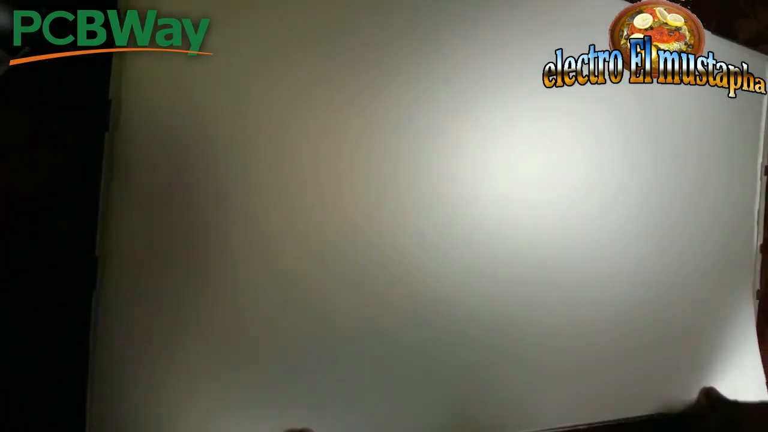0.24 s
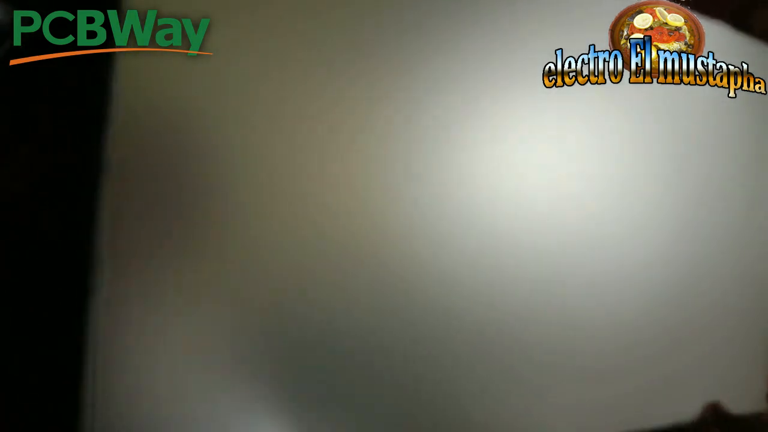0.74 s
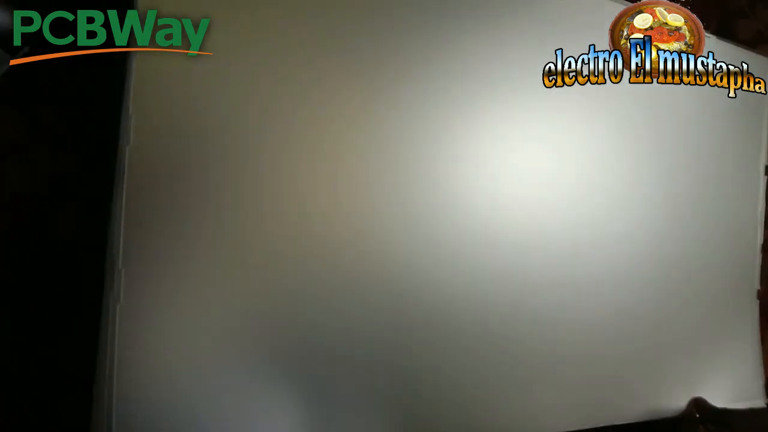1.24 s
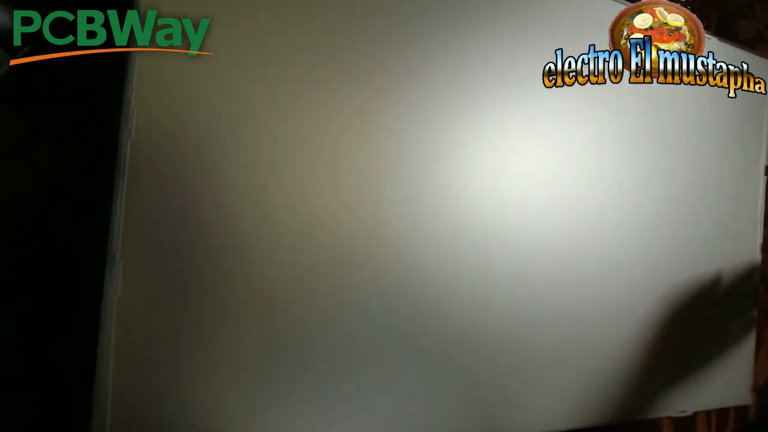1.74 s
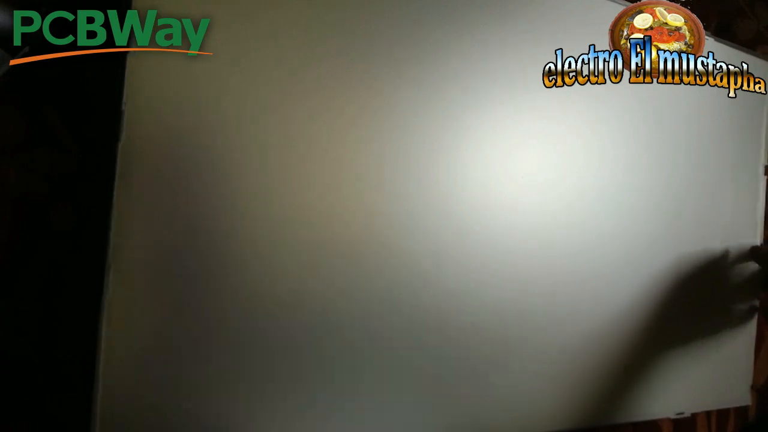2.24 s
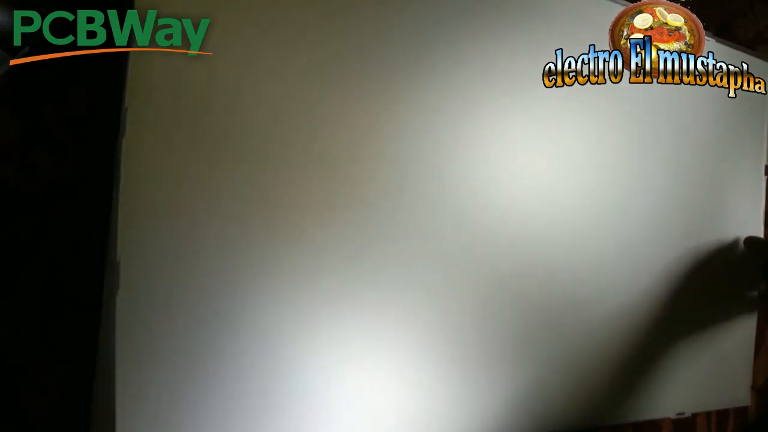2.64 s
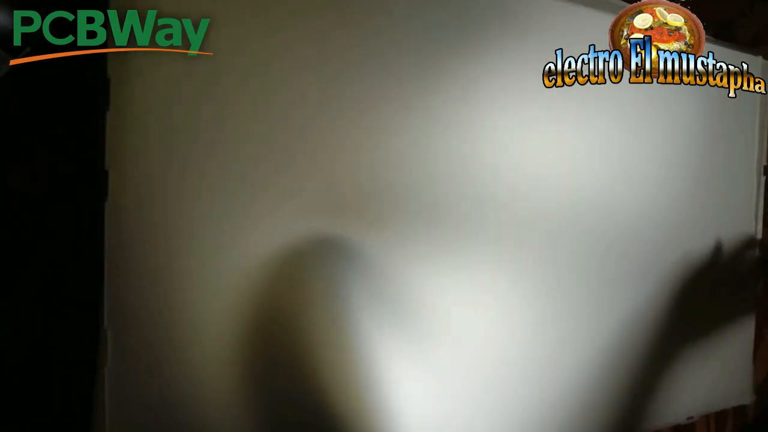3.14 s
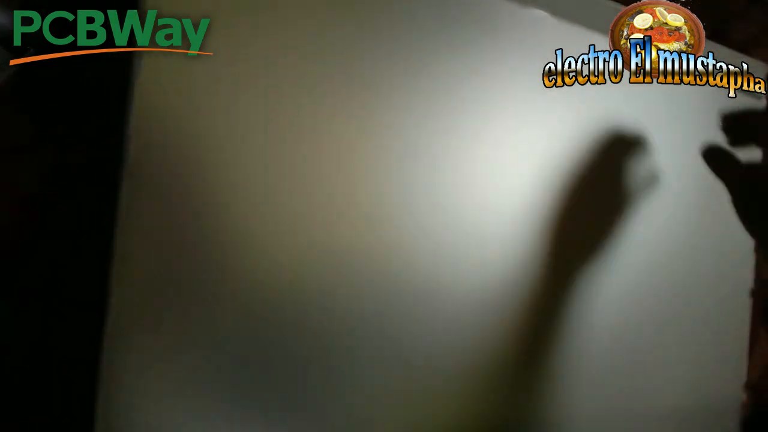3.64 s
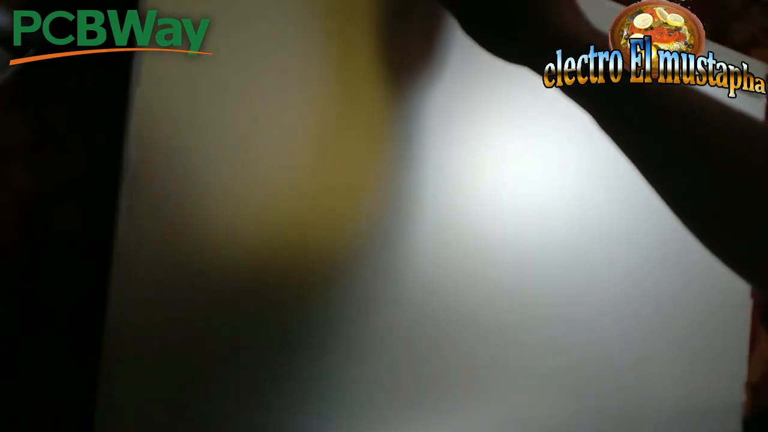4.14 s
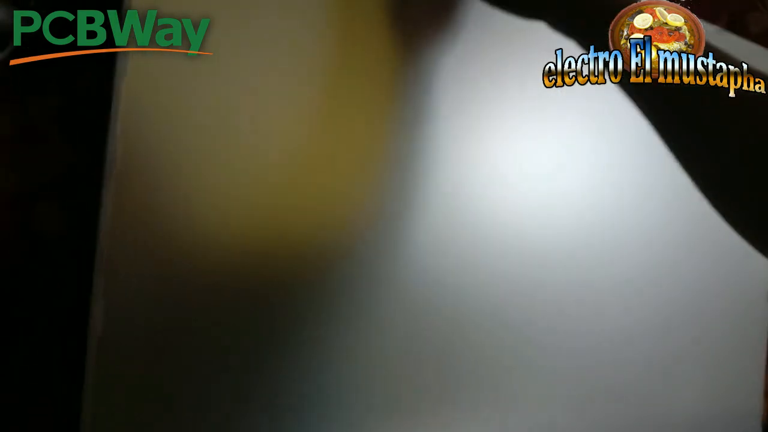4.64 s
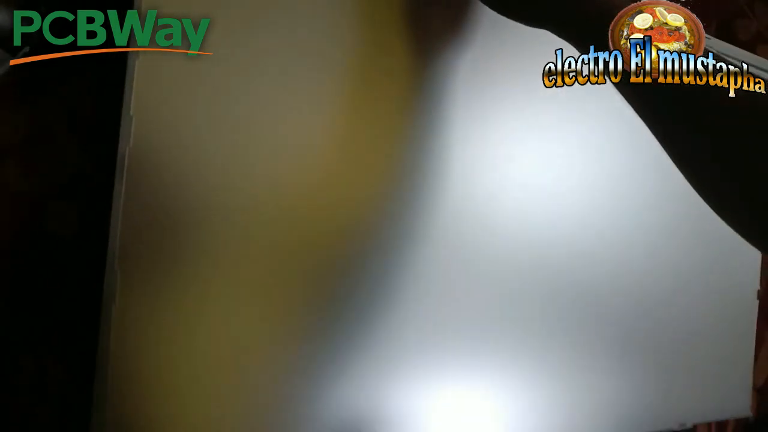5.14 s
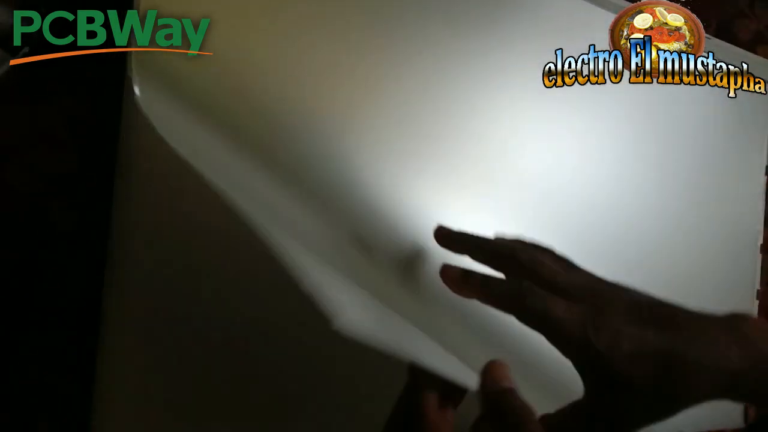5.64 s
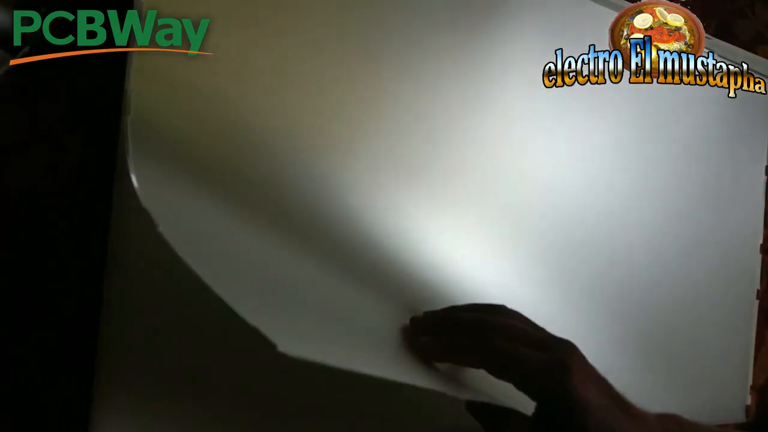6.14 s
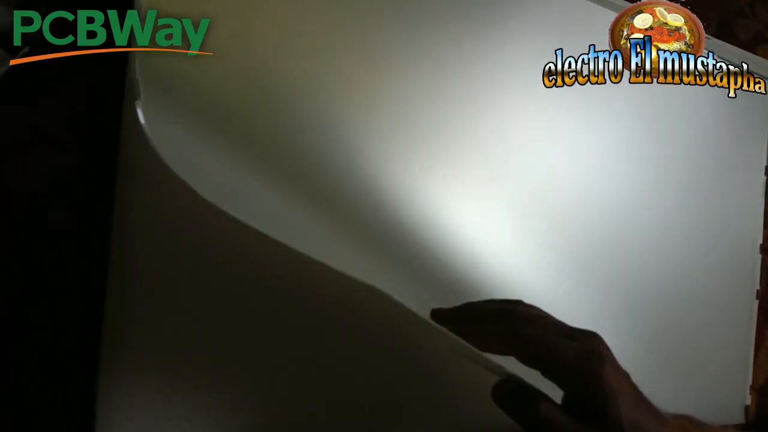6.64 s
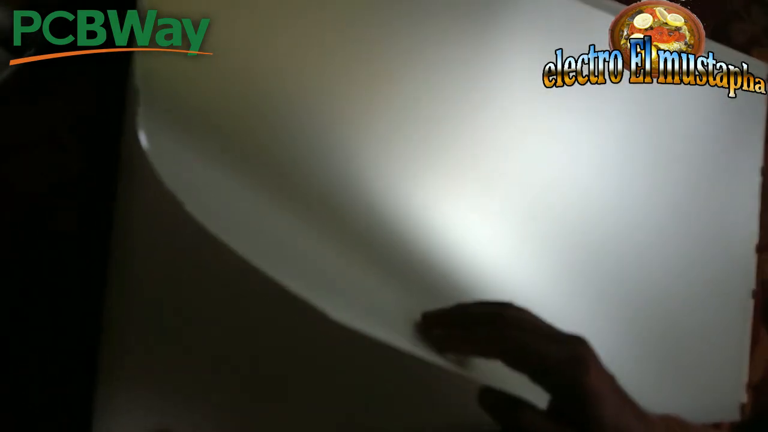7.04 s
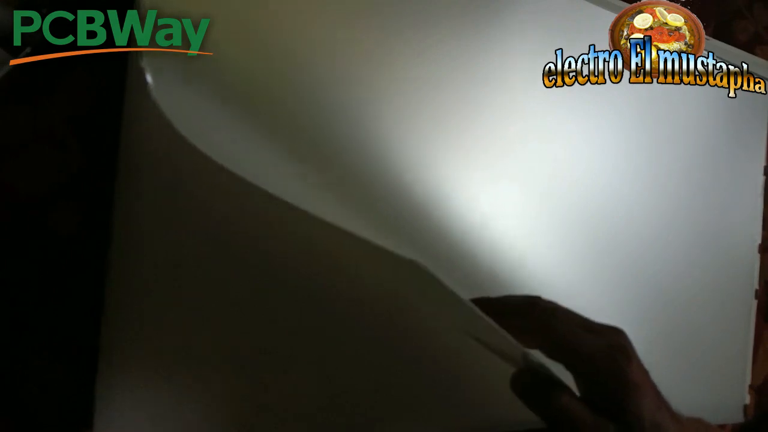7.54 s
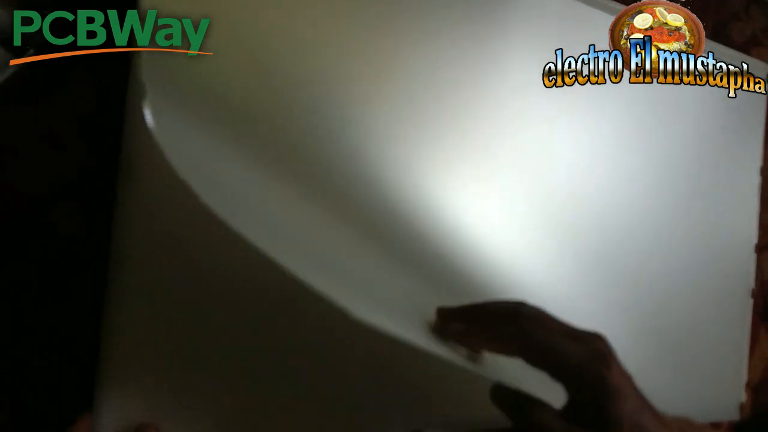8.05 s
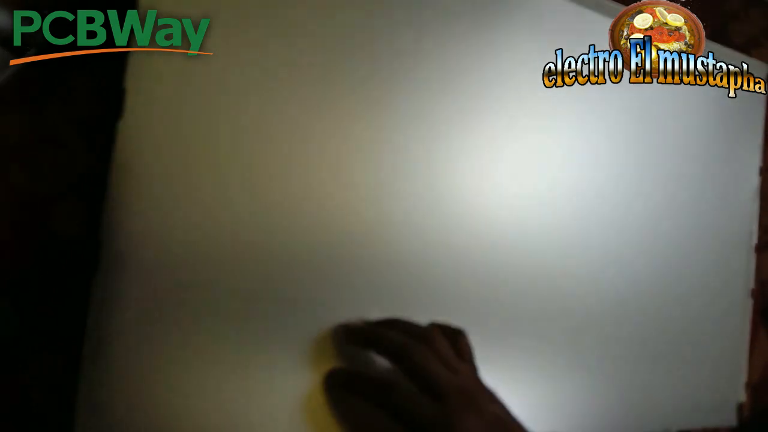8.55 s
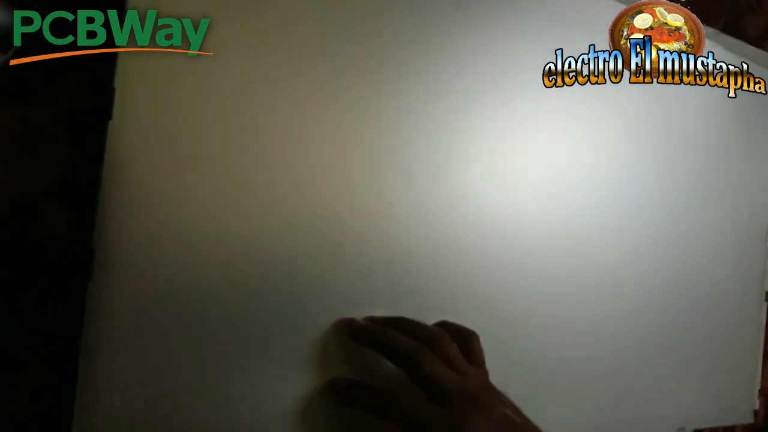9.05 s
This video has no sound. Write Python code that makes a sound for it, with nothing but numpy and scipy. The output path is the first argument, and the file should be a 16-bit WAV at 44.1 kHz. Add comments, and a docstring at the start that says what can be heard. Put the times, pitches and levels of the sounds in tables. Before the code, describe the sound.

Hands lift, slide and lay down springy plastic sheets over a metal-backed panel. Crisp little flicks, dull hollow taps and short grainy swishes come irregularly, busiest in the first three and a half seconds and again between five and seven. A few tiny squeaks are barely audible. The microphone is near and nearly central, in a small workshop with lumpy low noise and thin steady hiss.

```python
"""Plastic sheets over a display panel

Thin plastic sheets are lifted, slid and laid back over a display panel in a small, quiet workshop.
Edges click and flick as noise bursts coloured by resonances; rubbing faces are patchy, grainy noise.
Knocks are damped sines and scattered noise, with a faint ring of the metal back; squeaks are narrow noise.
Below them lie lumpy low noise, a steadier hiss and a thin, wavering microphone resonance.
"""
import sys
import numpy as np
from scipy import signal
from scipy.fft import rfft, irfft
from scipy.io import wavfile
from scipy.ndimage import uniform_filter1d

SR = 44100
rng = np.random.default_rng(int(sys.argv[2]) if len(sys.argv) > 2 else 0)


def int16_out(signal):
    """Quantize to a 16-bit WAV file."""
    q = np.round(np.clip(np.atleast_2d(signal).T, -1, 1) * 32767)
    wavfile.write(sys.argv[1], SR, q.astype(np.int16))


N = 409688

# soft blows on the panel: (time [s], base level [dB], thump pitch [Hz], relative clack level [dB],
# looseness [0 held down by the hand, 1 dropped freely])
BLOWS = [(0.001, -42.5, 390, -37, 0), (0.3482, -56, 374, -25, 0.16), (0.669, -44, 207, -8, 0),
         (0.855, -52.5, 384, -13, 0.2), (1.157, -52, 432, -10, 0), (1.3412, -42, 447, -11, 0.14),
         (1.701, -60, 389, -34, 0.23), (2.682, -45.5, 215, -9, 0), (2.9079, -52.5, 216, -8.5, 0),
         (3.0162, -54, 172, -23, 0.072), (3.125, -61, 290, -5, 0), (3.232, -46, 226, -8, 0.14),
         (3.284, -33, 214, -6.5, 0), (4.4281, -40.5, 273.6, 2.5, 0.3), (5.186, -43.5, 177, -3.5, 0.06),
         (5.3818, -32, 362, -9.5, 0.41), (5.557, -51, 91, -13, 0), (6.4929, -54, 193, -9, 0),
         (6.7862, -40, 176, -2.5, 0.38), (7.124, -54, 464, -14, 0.11), (8.561, -57, 269, -1, 0.14)]


def amp(db):
    """Turns decibels into a linear gain."""
    return 10 ** (np.asarray(db) / 20)


def unit(x):
    """Scales a sound to an RMS of 1."""
    return x / np.sqrt(np.mean(x ** 2) + 1e-20)


def blow(x):
    """Scales a short sound to the energy of 30 ms at level 1."""
    return x / np.sqrt(np.sum(x ** 2) / (.03 * SR) + 1e-20)


def add(mix, s, sound):
    """Mixes a sound in at s seconds; a start before zero is moved to zero."""
    part = mix[max(round(s * SR), 0):][:len(sound)]
    part += sound[:len(part)]


def colour(points, hz):
    """Gain of a spectrum drawn on a log-frequency axis."""
    f, db = np.transpose(points)
    return amp(np.interp(np.log(hz + 1), np.log(f), db))


def resonances(hz):
    """Gain of the sheets' resonances and the microphone's, added in power to a flat floor."""
    # resonances of the sheets, with the microphone's near 1.24 and 15 kHz:
    # (frequency [Hz], width before the stretch below [Hz], level over the rest [dB])
    peaks = [(205, 7.1, 9), (288, 34, 3.5), (379.7, 5.7, 8.5), (476.4, 22, 6.5), (659.8, 8.7, 10.5),
             (948, 25, 6.5), (1236, 95, 12.5), (1544, 55, 6.5), (3060, 25, 8), (4320, 120, -0.5),
             (4730, 43, -1), (6060, 390, 6), (7100, 150, 13.5), (7520, 490, 10.5), (14950, 430, 21)]
    stretch = 1.65
    power = 1
    for f, width, db in peaks:
        detuning = 2 * (hz - f) / (stretch * width)
        power = power + (amp(db) ** 2 - 1) / (1 + detuning ** 2) ** 2
    return np.sqrt(power)


def band(hz, lo, hi):
    """Gain of a steep band-pass."""
    return 1 / np.sqrt((1 + (lo / (hz + 1)) ** 14) * (1 + (hz / hi) ** 14))


def hump(hz, centre_hz, sharpness):
    """Gain of one resonance."""
    return 1 / np.hypot(1, sharpness * (hz / centre_hz - centre_hz / (hz + 1)))


def shaped(x, gain):
    """Filters a sound by a spectral gain and levels it to an RMS of 1."""
    return unit(irfft(rfft(x) * gain, len(x)))


def dying(t, rise, t60):
    """Envelope that builds up and dies away."""
    return (1 - np.exp(-t / rise)) * np.exp(-np.log(1000) * t / t60)


def ripple(along, spacing):
    """Random hills and valleys along frequency or time, with a spread of about 1."""
    knots = rng.standard_normal(1024)
    return np.interp(along / spacing, np.arange(len(knots)), knots) * np.sqrt(3 / 2)


def patchy(x, patch_db):
    """Makes narrow regions of the spectrum come and go by smoothed random gains in time and frequency."""
    z = signal.stft(x, nperseg=1024, noverlap=768)[2]
    across_hz = uniform_filter1d(rng.standard_normal(z.shape), size=5, axis=0)
    patches = unit(uniform_filter1d(across_hz, size=12, axis=1))
    return unit(signal.istft(z * amp(patch_db * patches), nperseg=1024, noverlap=768)[1][:N])


def background(spectrum, level_db, resonance_db, waver_db=1.26, hiss_waver_db=-0.1, rumble_top_hz=500,
               lump_db=3.8, resonance_hz=1235, resonance_width_hz=80, resonance_waver_db=-1.5):
    """Lumpy low background noise and steadier hiss, with a thin wavering microphone resonance."""
    hz = np.fft.rfftfreq(N, 1 / SR)
    slow = 1 / (1 + (hz / 6) ** 4)  # keeps only drift below about 6 Hz
    waver, resonance_waver = (shaped(z, slow) for z in rng.standard_normal((2, N)))
    noise = amp(level_db) * shaped(patchy(rng.standard_normal(N), lump_db), colour(spectrum, hz))
    rumble = irfft(rfft(noise) * band(hz, 0, rumble_top_hz), N)
    hiss = noise - rumble
    # squaring the resonance narrows it further
    narrow = hump(hz, resonance_hz, resonance_hz / resonance_width_hz) ** 2
    resonance = shaped(rng.standard_normal(N), narrow)
    wavering_noise = amp(waver_db * waver) * rumble + amp(hiss_waver_db * waver) * hiss
    return wavering_noise + amp(resonance_db + resonance_waver_db * resonance_waver) * resonance


def slides(drag_trim_db=-1, swell=1.22, speeding_up=0.49,
           catch_db=5.5, catches_per_s=300, catch_size=1.5, patch_db=3.5):
    """Faces rub with a fine hiss and tiny catches; the level follows the speed of the stroke."""
    # strokes of a sheet: (fastest moment [s], length [s], hiss level [dB], low drag level before trim [dB])
    strokes = [(-0.008, 0.15, -67, -50), (0.14, 0.25, -59, -61.5), (0.417, 0.083, -65, -79),
               (0.835, 0.2, -58, -56.5), (1.146, 0.15, -56.5, -57), (1.267, 0.17, -63.5, -58),
               (2.097, 0.51, -77, -56), (2.83, 0.35, -56.5, -58.5), (3.198, 0.41, -56, -62.5),
               (3.496, 0.17, -64.5, -67), (3.9, 0.099, -79, -62), (4.2, 0.18, -64.5, -74),
               (4.987, 0.29, -61.5, -66.5), (5.177, 0.15, -64, -50.5), (5.37, 0.21, -57.5, -65),
               (5.593, 0.24, -68, -58), (5.714, 0.15, -50.5, -52), (5.927, 0.32, -71.5, -64),
               (6.454, 0.13, -55, -56.5), (6.712, 0.12, -58, -52), (6.779, 0.06, -51.5, -50.5),
               (8.336, 0.27, -68.5, -82.5), (8.664, 0.25, -51.5, -69), (8.947, 0.24, -59.5, -63.5),
               (9.2, 0.3, -60, -72)]
    # colour of rubbing: (frequency [Hz], relative level [dB])
    rub_colour = [(250, -13.5), (950, -10), (1800, -15.5), (2600, -10.5), (3400, 1.5), (4200, 9),
                  (6200, 5.5), (6650, -4), (7300, 1), (8200, 1.5), (9200, -9.5), (12000, -15.5),
                  (16000, -32)]
    t, hz = np.arange(N) / SR, np.fft.rfftfreq(N, 1 / SR)
    caught = rng.random(N) < catches_per_s / SR
    catches = caught * amp(catch_db * np.minimum(rng.exponential(1, N), 4))
    # the contact wanders, so narrow resonances come and go
    friction = patchy(rng.standard_normal(N) * (1 + catch_size * catches), patch_db)
    peaks_gain = resonances(hz)
    tone = colour(rub_colour, hz) * peaks_gain
    hiss = shaped(friction, tone * band(hz, 1800, 17000))
    drag = shaped(friction, tone / np.sqrt(peaks_gain) * band(hz, 370, 2216))  # weaker peaks in the drag
    out = np.zeros(N)
    for s, length, hiss_db, drag_db in strokes:
        # speeding_up is the share of a stroke before its fastest moment
        rise, fall = length * speeding_up, length * (1 - speeding_up)
        on = (t > s - rise) & (t < s + fall)
        loudness = np.interp(t[on], [s - rise, s, s + fall], [0, 1, 0]) ** swell
        out[on] += loudness * (amp(hiss_db) * hiss[on] + amp(drag_db + drag_trim_db) * drag[on])
    return out


def knocks(thump_t60=0.11, thump_db=-2, boom_db=-5, boom_t60=0.19,
           clack_t60=0.013, clack_db=-5, rattle_db=-3, rattle_t60=0.18,
           bench_hz=105, bench_db=-20, bench_t60=0.26, back_db=-8, bounce_s=0.0076, bounce_db=-8.5):
    """A blow pushes a damped low mode and a stiffer one; both scatter, and the metal back rings on."""
    # modes of the metal back: (frequency [Hz], relative level [dB], t60 [s])
    back_modes = [(340, -14, 1), (484, -5, 0.76), (607, -4.5, 0.717), (625, 7, 0.26), (717, 3, 0.53),
                  (1185, 12, 0.19)]
    t = np.arange(2 ** 15) / SR
    hz, out = np.fft.rfftfreq(len(t), 1 / SR), np.zeros(N)
    peaks_gain = resonances(hz)
    for s, strength_db, low_hz, hard_db, loose in BLOWS:
        low_noise, high_noise = rng.standard_normal((2, len(t)))
        # the stiff mode lies at a fixed multiple of the thump, up to a limit in Hz
        high_hz = min(3.6 * low_hz, 1100)
        thump = blow(np.sin(2 * np.pi * low_hz * t) * dying(t, 0.0022, thump_t60))
        boom_gain = peaks_gain * hump(hz, low_hz, 0.58) * band(hz, 90, 580)
        boom = blow(shaped(low_noise, boom_gain) * dying(t, 0.011, boom_t60))
        clack = blow(np.sin(2 * np.pi * high_hz * t) * dying(t, 0.0026, clack_t60))
        rattle_gain = peaks_gain * hump(hz, high_hz, 2.0) * band(hz, 610, 1104)
        rattle = blow(shaped(high_noise, rattle_gain) * dying(t, 0.0019, rattle_t60))
        back = 0
        for f, db, t60 in back_modes:
            back = back + amp(db) * np.sin(2 * np.pi * (f * t + rng.random())) * dying(t, 0.0074, t60)
        # the bench gives under the panel, at a slightly different pitch each time
        bench_tone = np.sin(2 * np.pi * bench_hz * rng.uniform(1.0, 1.09) * t)
        bench = blow(bench_tone * dying(t, 0.013, bench_t60))
        low = amp(thump_db) * thump + amp(boom_db) * boom + amp(bench_db) * bench
        high = amp(hard_db) * (amp(clack_db) * clack + amp(rattle_db) * rattle)
        add(out, s, amp(strength_db) * (low + high + loose * amp(back_db) * back))
        # a loose sheet lands a second time
        add(out, s + bounce_s, loose * amp(strength_db + bounce_db) * (low + high))
    return out


def slaps(slap_db=-21.5, body_db=7, fizz_db=-25, snap_share=0.23):
    """The sheet slaps dully under each blow; rows are laid out like the flicks in clicks()."""
    return [(s, db + slap_db, body_db, fizz_db, snap_share) for s, db, *_ in BLOWS]


def tiny_ticks(count=34, loudest_db=-72, range_db=6, body_db=0.0, fizz_db=-18, snap_share=0.26):
    """Faint ticks of the sheets shifting in the hands, at random times; rows like the flicks in clicks()."""
    return [(when * N / SR, loudest_db - range_db * size, body_db, fizz_db, snap_share)
            for when, size in rng.random((count, 2))]


def clicks(snap_t60=0.02, snap_cycles=6, rise_cycles=1.0, soft_rise=0.001725,
           late_db=-27, late_t60=0.16, fine_db=4.5, fine_hz=40, spot_db=2.0, spot_hz=330,
           lead_in_db=-17, lead_in_t60=0.029, crackle_db=1.0, crackle_s=0.0012):
    """An edge snaps; bending waves then scatter through the sheet and the room."""
    # flicks and taps of a sheet: (time [s], base level [dB], relative body level before band offsets [dB],
    # relative edge fizz level [dB], share of the first snap before limiting [0-1])
    flicks = [(0.494, -64.5, -4.5, -24, 0.05), (0.5725, -48, -13.5, -18, 0.43),
              (0.5951, -50.5, -6, -19, 0.27), (0.652, -58.5, 0.5, -26, 0.26),
              (0.735, -48.5, -17.5, -3.5, 0.38), (1.0317, -43.5, -2.5, -8, 0.27),
              (1.3399, -44, -10, -8, 0.43), (1.8898, -48, -12, -48, 0.63), (1.988, -46, -17, -1, 0.49),
              (2.0768, -54, -6, -8, 0), (2.1108, -48, -6.5, -15, .3), (2.351, -50, -10.5, -29, 0.54),
              (2.3764, -36.5, -4, -18.5, 0.51), (2.6499, -45, -1, -13, 0.16),
              (2.66, -33.5, -12.5, -62, 0.57), (2.723, -49, -2, -40, 0.63),
              (2.7668, -32.5, -13, -12.5, 0.56), (2.8373, -52.5, -6.5, -40, 0.8),
              (3.2262, -45, -7, -14, .26), (3.2656, -48.5, -9, -17, 0.4), (3.4013, -58, -12, -45, .73),
              (3.8326, -51.5, 1, -17, 0.23), (4.0731, -54.5, -6, -15, 0.34), (4.3386, -71.5, 6, -21, 0),
              (4.5842, -51.5, -2.5, -7.5, 0.57), (4.6635, -59.5, 4, -40, 0),
              (5.1539, -46, -3.5, -2.5, 0.13), (5.1765, -39, -6, -9.5, 0.37), (5.5847, -55, 2, -14, 0),
              (6.0133, -70.5, 3, -7, .5), (6.2746, -61, 4, -1, 0), (6.3612, -54.5, -6.5, -11, 0.27),
              (6.4917, -51, -1.5, -39, 0.49), (6.6577, -50, -15, -28, 0.5), (6.675, -51.5, -3.5, -12, 0),
              (7.1229, -54, 1.5, -46, 0.45), (7.2947, -60, 1, -10, 0.1), (7.4176, -63.5, 2, -10, 0.32),
              (7.7659, -53.5, -1, -26, 0), (7.8916, -56, 1, -59, 0.43), (8.5574, -62, -12, -9, 0.3),
              (8.862, -55.5, -9.5, -17.5, 0.2), (8.9736, -57.5, -1, -14, 0.06), (9.1944, -58, -6, -37, .3)]
    # broad colour of a click: (frequency [Hz], relative level [dB])
    snap_colour = [(250, -9.5), (700, -9), (1400, -15.5), (1900, -13.5), (2400, -0.5), (4000, 3.5),
                   (6000, 7.5), (6600, 2.5), (8200, 1.5), (9500, -5.5), (12000, -19), (14000, -26),
                   (16000, -28)]
    # limits of the five click bands: (frequency [Hz])
    band_edges = [320, 700, 1800, 4800, 11800, 17000]
    # ring of a click in each band: (t60 [s])
    band_t60 = [0.19, .17, 0.18, 0.14, 0.15]
    t = np.arange(2 ** 14) / SR
    hz, out = np.fft.rfftfreq(len(t), 1 / SR), np.zeros(N)
    # many weaker modes lie between the strong ones
    tone = colour(snap_colour, hz) * resonances(hz) * amp(fine_db * ripple(hz, fine_hz))
    bands = [(np.sqrt(lo * hi), tone * band(hz, lo, hi)) for lo, hi in zip(band_edges, band_edges[1:])]
    for s, db, body, fizz, share in [*flicks, *slaps(), *tiny_ticks()]:
        # upper minus lower treble [dB]: a sharper edge also brightens the treble
        tilt = 4 + 0.19 * fizz
        lower = -10 * np.log10(1 + amp(tilt) ** 2)  # both trebles together keep a power of 1
        # low body, hollow middle body, lower treble, upper treble, edge fizz [dB]
        levels = [body - 1.5, body + 2.6, lower, lower + tilt, fizz]
        share = np.clip(share, .02, .97)
        spot = amp(spot_db * ripple(hz, spot_hz))  # each striking spot favours its own modes
        crackle = amp(crackle_db * ripple(t, crackle_s))  # the scattered waves come back in uneven bursts
        for (centre, gain), rel, t60 in zip(bands, levels, band_t60):
            first, rest = (shaped(z, gain * spot) for z in rng.standard_normal((2, len(t))))
            rise = rise_cycles / centre  # low bending waves arrive later and last longer
            snap = blow(first * dying(t, rise, snap_t60 * (1 - share) + snap_cycles / centre))
            scatter = dying(t, rise + soft_rise * (1 - share), t60)
            late = amp(late_db) * dying(t, .01, late_t60)
            ring = blow(rest * crackle * (scatter + late))
            # a short noise swell leads into the snap
            lead_in = blow(first * dying(t, 0.000174, lead_in_t60)[::-1])
            add(out, s, amp(db + rel) * (np.sqrt(share) * snap + np.sqrt(1 - share) * ring))
            # it swells up to s, unless add() has to move its start to zero
            add(out, s - len(t) / SR, amp(db + rel + lead_in_db) * (1 - share) * lead_in)
    return out


def squeaks(trim_db=1, width_hz=340):
    """An edge sticks and slips, briefly singing in one fuzzy resonance."""
    # faint edge squeaks: (time [s], decay time constant [s], pitch [Hz], level before trim [dB])
    squeals = [(0.198, 0.093, 3740, -71), (0.486, 0.051, 2020, -65.5), (4.069, 0.053, 3410, -57.5),
               (4.338, 0.052, 3440, -69), (5.98, 0.016, 1830, -65), (8.262, 0.024, 1570, -63),
               (8.861, 0.024, 1830, -52)]
    t = np.arange(2 ** 14) / SR
    hz, out = np.fft.rfftfreq(len(t), 1 / SR), np.zeros(N)
    for s, length, pitch_hz, db in squeals:
        # squaring the resonance narrows it further
        tone = shaped(rng.standard_normal(len(t)), hump(hz, pitch_hz, pitch_hz / width_hz) ** 2)
        envelope = (1 - np.exp(-t / 0.00077)) * np.exp(-(t / length) ** 2)
        add(out, s, amp(db + trim_db) * tone * envelope)
    return out


def scene():
    """The handling is heard from one point; only a little background noise differs between the channels."""
    # background noise common to both channels: (frequency [Hz], relative level per Hz [dB])
    common_spectrum = [(20, -32.5), (45, -15.5), (75, -3), (150, 4), (205, 0), (260, -12.5), (360, -10),
                       (600, -17.5), (1200, -19.5), (2400, -24), (7400, -31), (10000, -40), (14000, -38),
                       (15200, -32.5)]
    # steady microphone noise that differs between the channels: (frequency [Hz], relative level per Hz [dB])
    wide_spectrum = [(20, -9), (75, 1), (170, 3.5), (350, 0.5), (1000, -0.5), (2000, -3.5), (5900, -4),
                     (6700, -20), (10000, -18.5), (14000, -16.5), (15100, -7.5)]
    handling = slides() + knocks() + clicks() + squeaks()
    middle = handling + background(common_spectrum, level_db=-64.5, resonance_db=-77.5)
    # microphone noise with a little of the resonance, in opposite polarity left and right
    side = background(wide_spectrum, level_db=-78, resonance_db=-85.5, waver_db=1.5, lump_db=0.8)
    return np.array([middle + side, middle - side])


def record(dry, hiss_db=-94, cutoff_hz=16100):
    """A trace of independent hiss in each channel, then a low-pass that limits the band."""
    noisy = dry + amp(hiss_db) * rng.standard_normal(dry.shape)
    low_pass = signal.firwin(201, cutoff_hz, window=("kaiser", 8), fs=SR)
    return signal.oaconvolve(noisy, low_pass[None], "same", axes=1)


dry = scene()
out = record(dry)
int16_out(out)
```